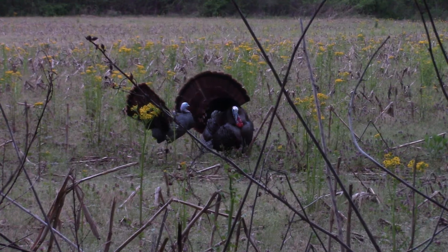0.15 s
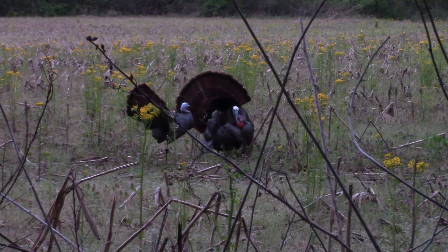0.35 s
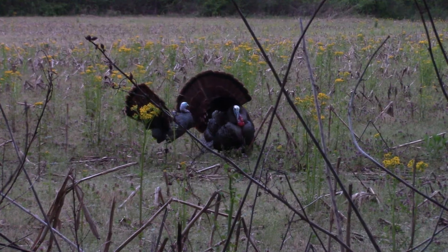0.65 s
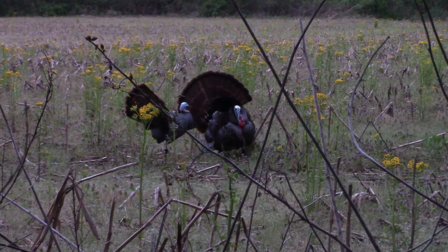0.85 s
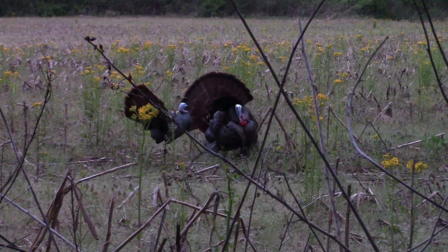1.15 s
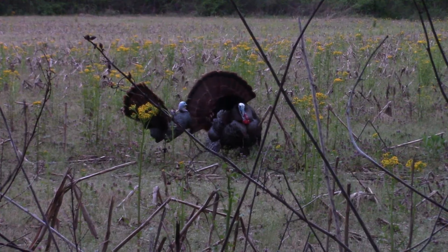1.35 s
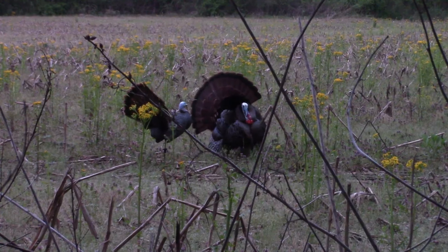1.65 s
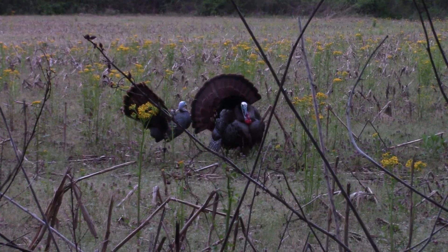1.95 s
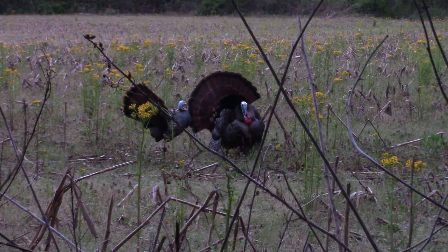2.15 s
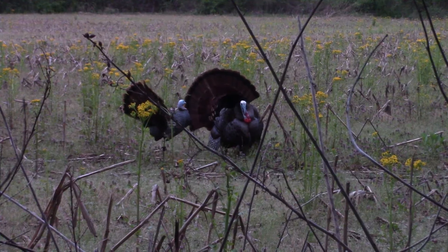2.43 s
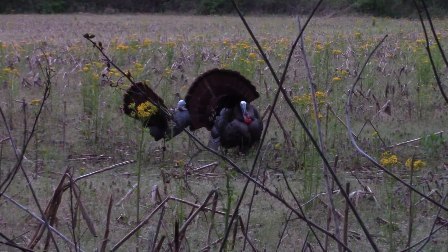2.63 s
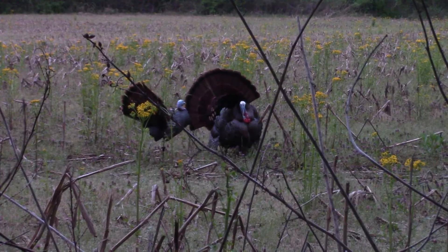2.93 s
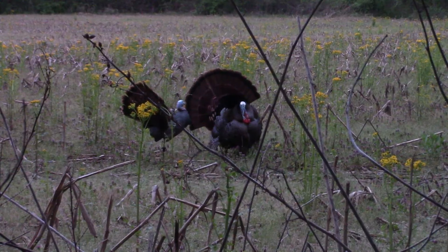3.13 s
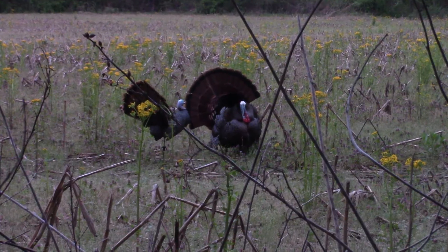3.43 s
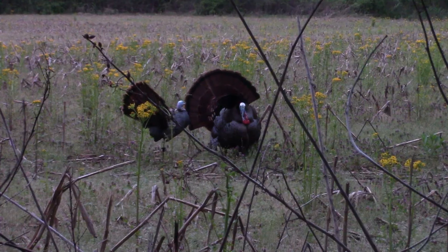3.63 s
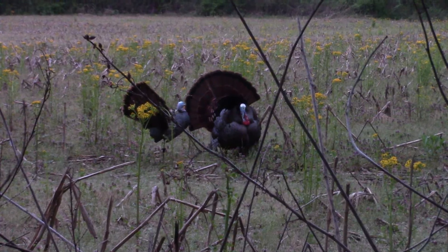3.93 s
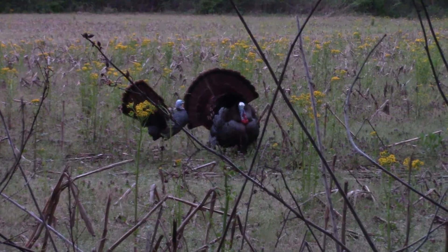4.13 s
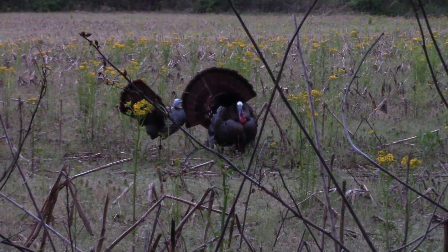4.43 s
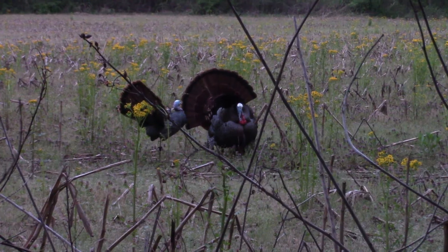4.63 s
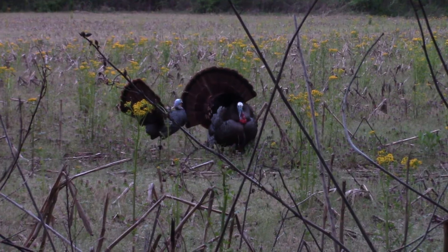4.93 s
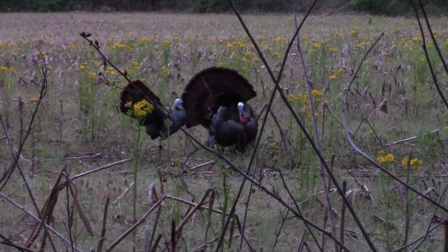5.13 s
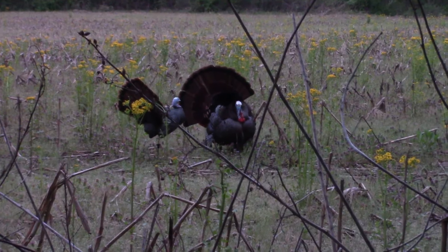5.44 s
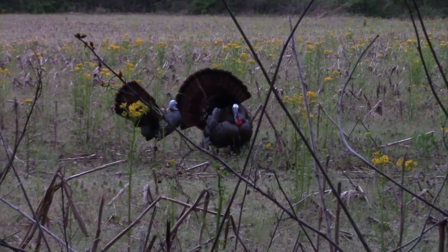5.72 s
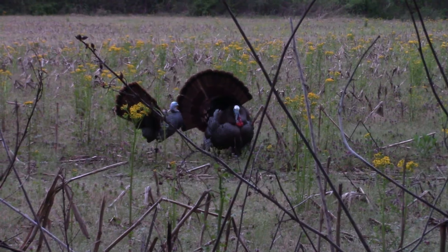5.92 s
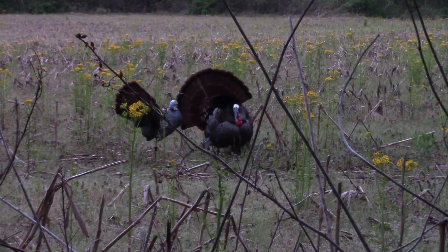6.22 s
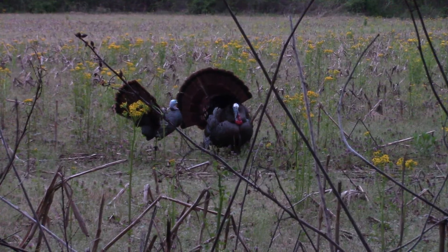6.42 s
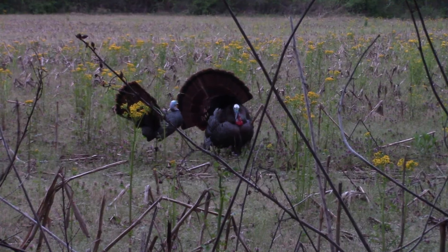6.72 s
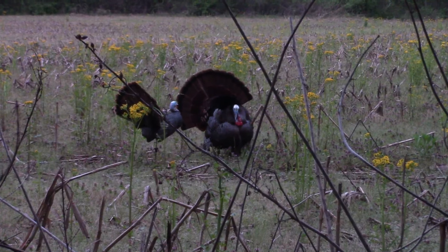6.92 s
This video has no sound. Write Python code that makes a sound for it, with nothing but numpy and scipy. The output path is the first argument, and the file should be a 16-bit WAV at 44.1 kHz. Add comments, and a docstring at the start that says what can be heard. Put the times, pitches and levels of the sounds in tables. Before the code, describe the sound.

Stereo outdoor microphone near a turkey in a dry field. First only gentle air hiss, distant whistles, quick twitters and a slight weed rustle. Then nine abrupt, nasal, buzzing yelps, each under a tenth of a second, swooping down, rasping and flicking up, growing harsher and stronger, with quiet whines leading into several. Scant echo from weeds and trees. Afterwards distant birds and small dry ticks.

```python
"""Turkey calls in an open field

Nine loud calls swoop down in pitch, rasp to varying degrees and flick up; each is a buzzing membrane
and noisy puffs of breath shaped by a throat. Soft whines come between, most of them leading into a call.
Far songbirds, made of fluttering sines with echoes, sing over a soft wash of shaped noise. Short bursts
of band noise make the rustling weeds and ticking stalks. A fast limiter ducks the loudest peaks and
lets the field swell back."""
import sys
import numpy as np
from scipy import signal
from scipy.fft import rfft, irfft
from scipy.io import wavfile
from scipy.ndimage import uniform_filter1d, minimum_filter1d

SR = 44100
rng = np.random.default_rng(int(sys.argv[2]) if len(sys.argv) > 2 else 0)


def inscribe(sig):
    """Save sig as 16-bit PCM at rate SR to the path in sys.argv[1].

    A 1-D sig is mono; a 2-D sig holds one channel per row.
    Samples are clipped to [-1, 1] before scaling.
    """
    pcm = np.round(np.clip(np.atleast_2d(sig).T, -1, 1) * 32767)
    wavfile.write(sys.argv[1], SR, pcm.astype(np.int16))


N = 311786

# colour of the wash of air, relative: frequency_hz, level_db_per_hz
AIR_COLOUR = [(12, -44), (20, -15.5), (157, -14.5), (404, -4), (613, -4), (725, -1.5), (857, -2.5),
              (931, -3.5), (1260, -5), (1770, -7), (2030, -7.5), (2760, -6), (3000, -9), (7300, -20.5),
              (15500, -36.5)]
# likeness of the wash in the two ears: frequency_hz, likeness_0_to_1
AIR_LIKENESS = [(60, 0.07), (130, 0.13), (290, 0.45), (640, 0.12), (1410, 0.19), (3100, 0.44), (6820, 0.26),
                (15000, 0.35)]
# stereo balance of the wash: frequency_hz, left_minus_right_db
AIR_TILT = [(60, -0.5), (180, 0), (550, -0.5), (1650, 0), (4970, 0.0), (15000, 0.5)]
AIR_RMS_DB = -41

# far whistles gliding to a held note, mostly from below; levels before stereo placing:
# start_s, length_s, level_db, held_hz, scoop_hz (how far below the held note the glide begins)
WHISTLE_NOTES = [(-.03, .1, -36, 2794, 201.5), (.13, 0.031, -42, 3390, 452), (0.177, 0.1, -35.5, 2800, 204),
                 (0.392, .14, -37, 2770, 214), (0.961, .13, -49, 2840, 199),
                 (1.169, 0.073, -45, 3260, -1.5), (1.21, .112, -46.5, 2800, 4),
                 (1.561, 0.079, -44, 3262, 6), (3.799, 0.18, -44, 2740, -57),
                 (4.071, 0.047, -35, 2990, 505), (4.356, 0.072, -38, 3030, 498),
                 (4.408, 0.042, -37.5, 2450, -370), (4.635, 0.24, -52, 2760, 57),
                 (6.613, .13, -36.5, 2757, 400), (6.796, .045, -46, 3120, 0), (6.839, .12, -34, 2770, 243),
                 (7.041, .113, -47, 2720, 200)]
SCOOP_S = .04  # time constant of the glide
# one falling slur, repeated; levels before stereo placing: start_s, level_db
SLUR_REPEATS = [(0.046, -39.5), (0.304, -41), (0.562, -41.5), (0.834, -41), (1.107, -41), (1.362, -42),
                (1.627, -40.5), (1.895, -40.5), (2.153, -40.5), (2.417, -37.5)]
SLUR_S, SLUR_TOP_HZ, SLUR_END_HZ, SLUR_FALL_S = 0.095, 2470, 1664, .036
# notes of a quick phrase: after_start_s, length_s, level_db (relative to the phrase),
# first_hz, middle_hz, last_hz, taper_share (part of the note spent swelling and fading)
PHRASE_NOTES = [(0, 0.013, -0.5, 3930, 4190, 4440, 0.44), (0.008, 0.031, -2, 5040, 4870, 4770, 0.5),
                (0.077, 0.015, 2.5, 3380, 3885, 2850, 0.31), (0.162, .025, -3.5, 2670, 3140, 2550, 0.38),
                (0.342, .024, 1, 2440, 3006, 4340, .2), (0.364, 0.024, 8, 4330, 3440, 3000, .4),
                (.435, .1, 5.5, 1950, 2644, 3250, .7), (.535, .034, 4.5, 3200, 3040, 2920, 0.31),
                (0.592, .065, 2.5, 2984, 2650, 2266, 0.37), (0.666, 0.042, -3, 2390, 2175, 2024, 0.4)]
# when the phrase is sung; levels before stereo placing: start_s, level_db
PHRASE_REPEATS = [(1.692, -37), (5.761, -38)]

# brief rustles in the weeds: start_s, length_s, level_db, centre_hz, width_octaves
WEED_RUSTLES = [(1.122, 0.061, -38, 6070, 0.12), (1.131, 0.035, -34.5, 2720, 0.98),
                (1.261, 0.19, -56, 8300, 0.28), (6.536, 0.093, -45.5, 5200, 0.32)]
# ticks and knocks of dry stalks: start_s, level_db, centre_hz, width_octaves, t60_s
STALK_TICKS = [(4.057, -38, 1300, 0.43, 0.024), (5.5265, -26, 5260, 0.64, 0.017),
               (5.802, -37, 2500, 0.63, 0.016), (6.8, -33.5, 555, 0.14, 0.049),
               (6.849, -30.5, 1950, 1.13, 0.03)]

# the throat's resonances, relative: frequency_hz, level_db
THROAT_COLOUR = [(150, -49.5), (350, -22), (510, -17), (640, -10), (870, -8), (1110, 1), (1500, 5.5),
                 (1830, -3), (2230, -4.5), (2440, -19.5), (2880, -9), (3170, -17), (3540, -9),
                 (3900, -17.5), (4500, -32), (7000, -41), (9000, -40), (11500, -58.5), (15500, -66.5)]
# loud calls: start_s, length_s, attack_s, effort_db, first_hz, low_hz, fall_s,
# clear_s (time until the rasp clears), roughness (0 up to about 1), opening_db_per_octave (of the beak)
LOUD_CALLS = [(2.488, 0.073, .0035, -0.5, 1201, 1051, 0.0146, 0.069, 0.05, -0.3),
              (2.665, 0.089, 0.0058, -5.5, 1342, 733.5, .019, 0.074, 0.21, -0.2),
              (2.965, .075, 0.011, -1.5, 1203, 627, .007, 0.058, 0.21, 0),
              (3.296, .075, 0.0033, 5.5, 1689, 704, .01, 0.055, 0.55, -.1),
              (3.699, .089, 0.01, 3, 1323, 1122, .007, 0.062, 0.61, -0.4),
              (4.147, 0.069, 0.013, 2.5, 1440, 1160, 0.0087, 0.056, 1.1, -2.6),
              (4.563, .074, .007, 6, 775, 635.2, .005, .053, 0.37, 0.2),
              (5.012, 0.072, 0.0033, 5.5, 1658, 1148, .011, 0.052, 0.48, -0.2),
              (5.4234, .067, .004, 7.5, 1604, 1125, .006, 0.049, 0.57, -0.7)]
# soft whines: start_s, length_s, level_db, middle_hz, rise_octaves, roughness_0_to_1
SOFT_WHINES = [(3.263, .04, -36.5, 469, 0.68, 0.3), (3.685, .019, -32, 594, .32, .3),
               (4.119, 0.072, -29, 548, .26, 0.42), (4.314, .15, -38, 382, 0.018, 0.8),
               (4.97, 0.069, -25, 548, .55, 0.24), (5.392, .048, -31, 478, .6, 0.2)]
# stereo balance of the turkey: frequency_hz, left_minus_right_db
CALL_TILT = [(200, -0.5), (1300, -0.8), (2400, -2.2), (4400, -1), (8100, 5), (15000, 8)]
# stereo phase of the turkey: frequency_hz, left_lead_radians
CALL_LEAD = [(100, .02), (700, 0.36), (1150, 0.22), (1800, 0.64), (3500, 1.16), (7500, 2), (10000, 0.66)]

# the first push, in dB per unit of roughness, dies with time constant PUSH_S; then the call tires
PUSH_DB, PUSH_S, TIRE_DB_PER_S = 16.5, 0.0027, -48
RELEASE_S, SHUT_DB = 0.011, -24.5
# just before the rasp clears, a sunken voice cracks back to its clear register
CLEAR_HZ, CRACK_LEAD_S, CRACK_S, CRACK_ROUGH = 1087, .011, 0.0021, 0.32
CLEARING_S, CLEAR_ROUGH_SHARE = 0.0027, 0.29
# every call ends on an upward flick
FLICK_HZ, FLICK_S, FLICK_LEAD_S = 842, 0.01183, 0.0251
# the second membrane swells in while the voice is sunk and rough; the rasp also shudders in level
SECOND_HZ, SECOND_SHARE, SHUDDER_DB, SHUDDER_HZ = 1137, 1.0, 2, 90
WHINE_ARCH = 0.036  # share by which both ends of a whine sag in pitch
WHINE_SWELL_DB = 4  # growth from start to end of a whine


def amp(db):
    """Decibels to gain."""
    return 10 ** (np.asarray(db) / 20)


def evened(x):
    """Scales to rms 1."""
    return x / np.sqrt(np.mean(x ** 2) + 1e-20)


def read(points, hz):
    """Reads a curve on a log-frequency axis."""
    f, value = np.transpose(points)
    return np.interp(np.log(hz + 1), np.log(f + 1), value)


def add(mix, s, sound):
    """Mixes a sound in at time s, trimming whatever falls outside."""
    start = round(s * SR)
    sound = sound[max(-start, 0):]
    part = mix[max(start, 0):][:len(sound)]
    part += sound[:len(part)]


def arch(length, first, middle, last):
    """A smooth pitch arch: the parabola through three values."""
    parabola = np.polyfit([0, .5, 1], [first, middle, last], 2)
    return np.polyval(parabola, np.linspace(0, 1, round(length * SR)))


def wander(size, hz):
    """Smooth random drift of rms 1 over its full cycle, rolling off steeply above hz."""
    f = np.fft.rfftfreq(16384, 1 / SR)
    noise = rng.standard_normal(16384)
    drift = irfft(rfft(noise) / (1 + (f / hz) ** 4))
    return np.resize(evened(drift), size)


def band_noise(size, hz, octaves):
    """Noise of rms 1 in a band that is bell-shaped over octaves."""
    f = np.fft.rfftfreq(size, 1 / SR) + 1
    bell = np.exp(-.5 * (np.log2(f / hz) / octaves) ** 2)
    return evened(irfft(rfft(rng.standard_normal(size)) * bell, size))


def echoes(x, t60, build, dull_hz):
    """Scatter: sparse, dulled reflections that build up and die away, different ones for each ear."""
    t = np.arange(SR) / SR
    taps = rng.choice([-1., 1.], (2, SR)) * (rng.random((2, SR)) < 1 / 10)
    taps = taps * (1 - np.exp(-(t / build) ** 2)) * np.exp(-np.log(1000) * t / t60)
    taps /= np.linalg.norm(taps, axis=1, keepdims=True)
    taps = signal.lfilter(*signal.butter(1, dull_hz, fs=SR), taps)
    return signal.fftconvolve(x[None], taps, axes=1)[:, :N]


def air(patchy_db=0.84, swell_db=1.5):
    """Distant air and leaves: noise shaped in short frames, with drifting patches and a slow swell."""
    frames, hz = N // 256 + 5, np.fft.rfftfreq(1024, 1 / SR)
    a, b, c, d, patches = rng.standard_normal((5, frames, len(hz)))
    patches = uniform_filter1d(patches, size=14, axis=0)
    patches = evened(uniform_filter1d(patches, size=10, axis=1))
    swell = evened(uniform_filter1d(rng.standard_normal(frames), size=90))[:, None]
    # the right ear shares part of the left ear's noise and adds its own
    same = read(AIR_LIKENESS, hz)
    left, own = a + 1j * b, c + 1j * d
    right = same * left + np.sqrt(1 - same ** 2) * own
    tilt = amp(read(AIR_TILT, hz) / 2)
    spectra = np.array([left * tilt, right / tilt])
    spectra *= amp(read(AIR_COLOUR, hz) + patchy_db * patches + swell_db * swell)
    wash = signal.istft(spectra.transpose(0, 2, 1), nperseg=1024, noverlap=768)[1][:, :N]
    return amp(AIR_RMS_DB) * evened(wash)


def chirp(db, hz, flutter_db=2.4, waver=.008):
    """A near-sine note whose level and pitch flutter on its way across the field."""
    size = len(hz)
    turns = np.cumsum(hz * (1 + waver * wander(size, 120))) / SR
    level_db = db + flutter_db * wander(size, 80)
    return amp(level_db) * np.sin(2 * np.pi * turns) * signal.windows.tukey(size, .1)


def whistles():
    """Notes whose pitch glides exponentially to a held tone."""
    out = np.zeros(N)
    for s, length, db, held_hz, scoop_hz in WHISTLE_NOTES:
        t = np.arange(round(length * SR)) / SR
        hz = held_hz - scoop_hz * np.exp(-t / SCOOP_S)
        add(out, s, chirp(db, hz) * signal.windows.tukey(len(hz), .25))
    return out


def slurs(fall_shape=1.624, taper=0.19):
    """Repeated notes, each sliding down and levelling off."""
    out, t = np.zeros(N), np.arange(round(SLUR_S * SR)) / SR
    hz = SLUR_END_HZ + (SLUR_TOP_HZ - SLUR_END_HZ) * np.exp(-(t / SLUR_FALL_S) ** fall_shape)
    for s, db in SLUR_REPEATS:
        add(out, s, chirp(db, hz) * signal.windows.tukey(len(t), taper))
    return out


def phrases():
    """A quick run of pitch arches, sung twice."""
    out = np.zeros(N)
    for s, db in PHRASE_REPEATS:
        for after, length, note_db, *pitches, taper in PHRASE_NOTES:
            hz = arch(length, *pitches)
            add(out, s + after, chirp(db + note_db, hz) * signal.windows.tukey(len(hz), taper))
    return out


def songbirds():
    """Three far singers echoed by the wood's edge; foliage also blurs the phrase singer."""
    whistler, slurrer, singer = whistles(), slurs(), phrases()
    # left and right gains place each bird
    direct = whistler * amp([[1], [-2]]) + slurrer * amp([[-1], [-1]]) + singer * amp([[2], [-2]])
    blur = echoes(singer, t60=0.13, build=.002, dull_hz=12000)
    scattered = amp(2.0) * whistler + amp(-4.5) * slurrer + amp(1.0) * singer
    wood = echoes(scattered, t60=1.0, build=0.006, dull_hz=6000)
    return direct + amp([[1], [-1]]) * (blur + wood)


def weeds():
    """Band-noise rustles swell and fade; stalks tick and die at once. Both scatter among the stems."""
    out = np.zeros(N)
    for s, length, db, hz, octaves in WEED_RUSTLES:
        size = round(length * SR)
        add(out, s, amp(db) * band_noise(size, hz, octaves) * signal.windows.tukey(size, .8))
    t = np.arange(SR // 10) / SR
    for s, db, hz, octaves, t60 in STALK_TICKS:
        add(out, s, amp(db) * band_noise(len(t), hz, octaves) * np.exp(-np.log(1000) * t / t60))
    return out + amp(-13) * echoes(out, t60=0.11, build=0.0011, dull_hz=10000)


def causal(spectrum, size=2048):
    """Minimum-phase impulse response of a spectrum."""
    log_gain = np.log(amp(read(spectrum, abs(np.fft.fftfreq(size, 1 / SR)))))
    return np.fft.ifft(np.exp(np.conj(signal.hilbert(log_gain)))).real[:size // 2]


def syrinx(hz, rough, slope, opening, jitter=0.0933, rasp_db=2, halves=0.12, even_db=-7, top_hz=5500,
           slack_db=6.0):
    """A membrane buzzes through the throat; roughness makes its cycles uneven and breaks them into puffs."""
    size, rough = len(hz), np.clip(rough, 0, 1)
    turns = np.cumsum(hz * (1 + jitter * (rough + 0.013) * wander(size, 527))) / SR
    # a taut membrane swings almost symmetrically, which weakens its even overtones
    taut = np.interp(hz, [750, 1050], [0, 1])
    k = np.arange(1, 9)[:, None]
    overtones = k ** -slope * amp(even_db * taut * (k % 2 == 0)) / (1 + (k * hz / top_hz) ** 6)
    # a slack one swings wide, which strengthens its fundamental
    overtones = overtones * amp(slack_db * (1 - taut) * (k == 1))
    buzz = (overtones * np.sin(2 * np.pi * k * turns)).sum(0)
    # a rough, taut membrane alternates strong and weak cycles
    alternation = wander(size, 120) * 2 * np.cos(np.pi * turns)
    buzz = buzz * (1 + halves * rough * taut * alternation)
    # puffs leave once a cycle and bunch into a coarse rattle
    rattle = amp(3 * wander(size, 260))
    puffs = rattle * (1 + 0.77 * np.cos(2 * np.pi * turns)) * rng.standard_normal(size)
    # the beak's opening tilts the throat's colour around 1200 Hz
    throat = causal([(f, db + opening * np.log2(min(f, 3000) / 1200)) for f, db in THROAT_COLOUR])
    buzz = evened(signal.fftconvolve(buzz, throat)[:size])
    puffs = evened(signal.fftconvolve(puffs, throat)[:size])
    voice = (1 - rough) * buzz + rough * amp(rasp_db) * puffs
    # the membrane's swing is bounded, so loudness follows the effort even while it rasps
    return voice / np.sqrt(abs(uniform_filter1d(voice ** 2, size=150)) + 1e-9)


def step(t, at, width):
    """A smooth step from 0 to 1."""
    return .5 + .5 * np.tanh((t - at) / (2 * width))


def yelp(length, attack_s, effort_db, first_hz, low_hz, fall_s, clear_s, roughness, fall_shape=2.1):
    """Level, pitch and roughness of a call that swoops down, rasps, cracks to a clear tone and flicks up."""
    t = np.arange(round(length * SR)) / SR
    sunk = 1 - np.exp(-(t / fall_s) ** fall_shape)
    cracked = step(t, clear_s - CRACK_LEAD_S, CRACK_S)
    swoop_hz = first_hz + (low_hz - first_hz) * sunk
    hz = (1 - cracked) * swoop_hz + cracked * max(CLEAR_HZ, low_hz)
    flick = step(t, length - FLICK_LEAD_S, FLICK_S / 3) * np.exp((t - length) / FLICK_S)
    hz = hz + FLICK_HZ * flick
    rasping = sunk * (1 - step(t, clear_s, CLEARING_S))
    rough = roughness * (CLEAR_ROUGH_SHARE + (1 - CLEAR_ROUGH_SHARE) * rasping)
    # the wider the jump between registers, the harsher the crack
    jump_octaves = abs(np.log2(CLEAR_HZ / low_hz))
    rough = rough + CRACK_ROUGH * jump_octaves * 2 * np.sqrt(cracked * (1 - cracked))
    # the rougher the call, the harder its first push
    push_db = PUSH_DB * roughness * np.exp(-t / PUSH_S)
    held_db = effort_db + push_db + TIRE_DB_PER_S * (t - length / 2)
    opened = np.clip(np.minimum(t / attack_s, (length - t) / RELEASE_S), 0, 1)
    return SHUT_DB + (held_db - SHUT_DB) * opened, hz, rough


def turkey(clear_slope=0.85, low_slope=.65, whine_slope=0.77, whine_opening=-2.5, second_rough=0.29):
    """Loud calls and shut-beak whines; in low calls the membrane slaps shut and its overtones grow."""
    out = np.zeros(N)
    for s, *gesture, opening in LOUD_CALLS:
        effort_db, hz, rough = yelp(*gesture)
        size = len(hz)
        slope = np.interp(hz, [750, 1050], [low_slope, clear_slope])
        voice = syrinx(hz, rough, slope, opening)
        # the second membrane grows along the call wherever the voice is low and rough
        low = np.interp(hz, [750, 1050], [1, 0])
        second = SECOND_SHARE * rough * low * np.linspace(0, 2, size)
        if second.any():
            voice = voice + second * syrinx(np.full(size, SECOND_HZ), second_rough, clear_slope, opening)
        voice = voice / np.sqrt(1 + second ** 2)
        level_db = effort_db + SHUDDER_DB * rough * wander(size, SHUDDER_HZ)
        add(out, s, amp(level_db) * voice * signal.windows.tukey(size, .03))
    for s, length, db, middle, rise, rough in SOFT_WHINES:
        ends = middle * (1 - WHINE_ARCH)
        hz = arch(length, ends / 2 ** (rise / 2), middle, ends * 2 ** (rise / 2))
        level_db = db + WHINE_SWELL_DB * np.linspace(-.5, .5, len(hz))
        voice = syrinx(hz, rough, whine_slope, whine_opening)
        add(out, s, amp(level_db) * voice * signal.windows.tukey(len(hz), .6))
    return out


def two_ports(x):
    """The call lags in phase at the right microphone port and has a slightly different colour there."""
    hz = np.fft.rfftfreq(N, 1 / SR)
    tilt = amp(read(CALL_TILT, hz) / 2)
    lag = np.exp(-1j * read(CALL_LEAD, hz))
    return irfft(rfft(x) * np.array([tilt, lag / tilt]), N)


def scene(stem_hz=2200):
    """The near turkey, its scatter from the weeds and the far trees, and the life of the field."""
    calls = turkey()
    # thin stems throw back short waves better than long ones
    thrown = signal.lfilter(*signal.butter(1, stem_hz, "highpass", fs=SR), calls)
    near = amp(-29.5) * echoes(thrown, t60=0.23, build=0.026, dull_hz=14040)
    far = amp(-50.0) * echoes(calls, t60=0.32, build=0.022, dull_hz=7940)
    field = near + far
    # each ear also hears most of the other ear's scatter
    field = field + 0.8 * field[::-1]
    return two_ports(calls) + field + songbirds() + weeds() + air()


def record(dry, recovery_db_per_s=240, lopsided=0.009, ceiling_db=0.57, edge_hz=15650):
    """A fast peak limiter, a slightly lopsided preamplifier that clips the tallest peaks, then a low-pass."""
    peak_db = 20 * np.log10(abs(dry).max(0) + 1e-9)
    # hold the running peak and let it recover at a steady rate
    fall = np.arange(N) * recovery_db_per_s / SR
    held_peak_db = np.maximum.accumulate(peak_db + fall) - fall
    over_db = np.maximum(held_peak_db - ceiling_db, 0)
    # the gain dips smoothly just ahead of each peak
    gain_db = minimum_filter1d(-over_db, size=91)
    gain_db = uniform_filter1d(uniform_filter1d(gain_db, size=45), size=45)
    held = dry * amp(gain_db)
    held = np.clip(held + lopsided * held ** 2, -1, 1)
    low_pass = signal.firwin(511, edge_hz, window=("kaiser", 9), fs=SR)
    return signal.oaconvolve(held, low_pass[None], "same")


dry = scene()
out = record(dry)
inscribe(out)
```